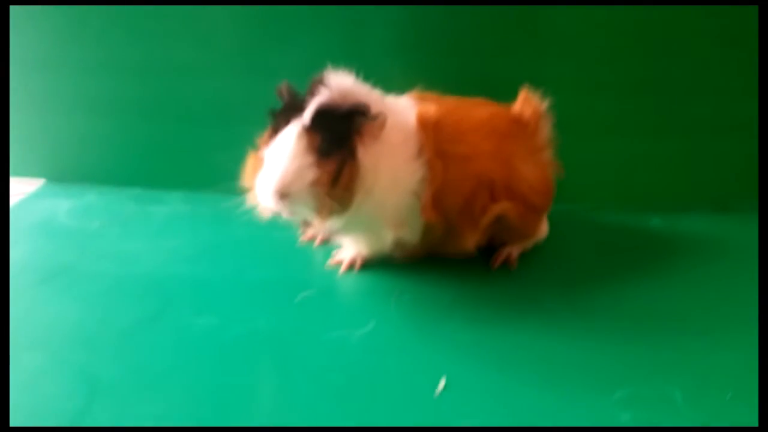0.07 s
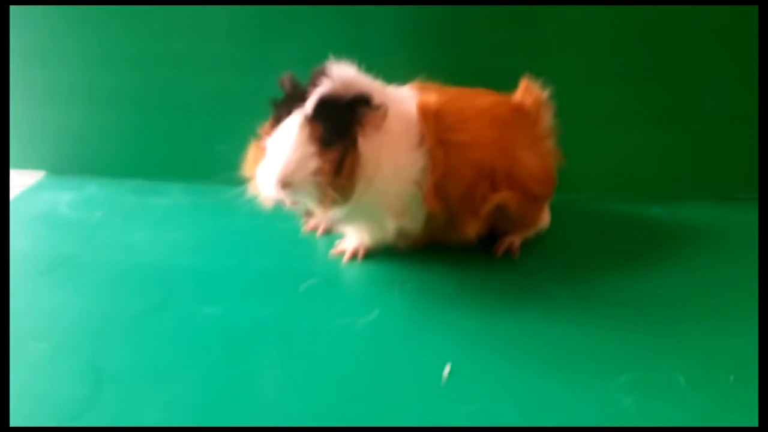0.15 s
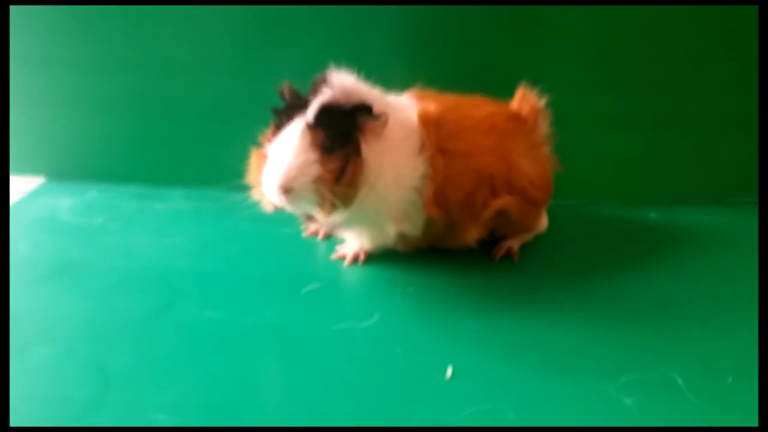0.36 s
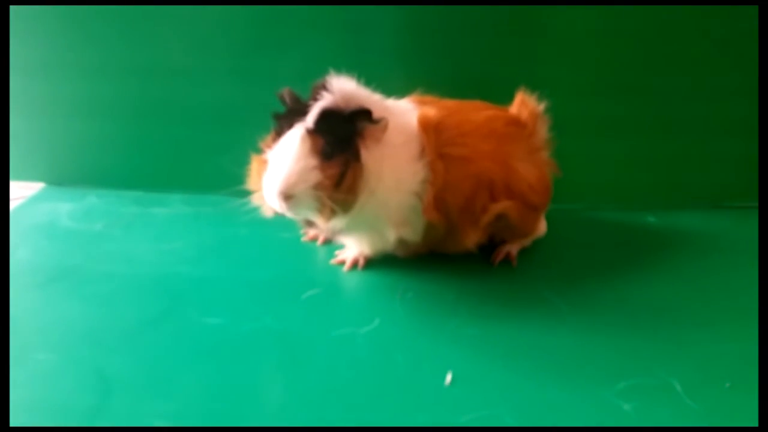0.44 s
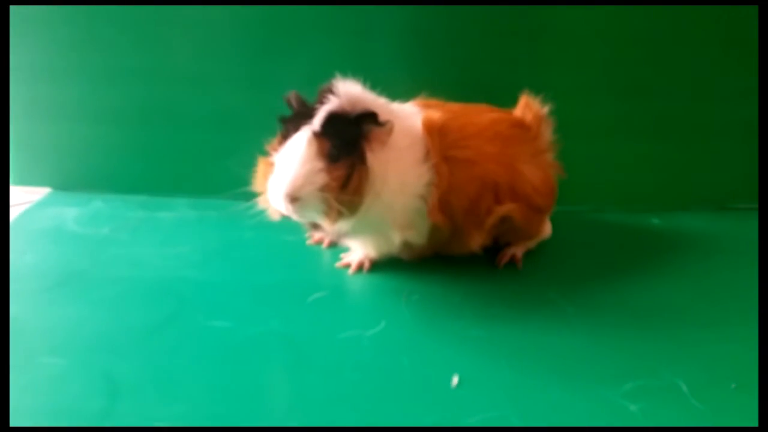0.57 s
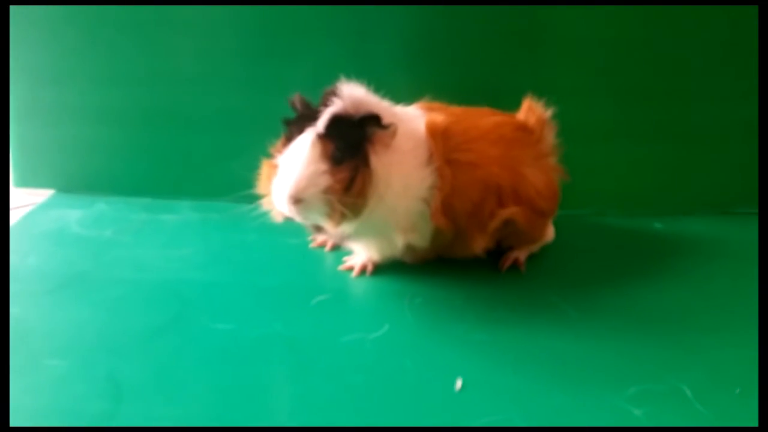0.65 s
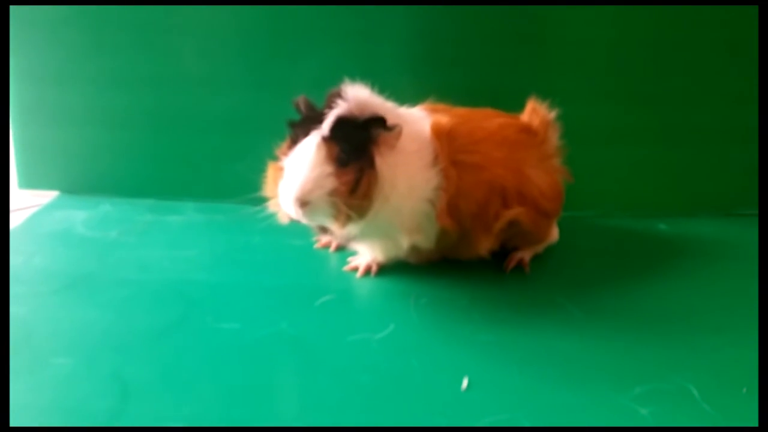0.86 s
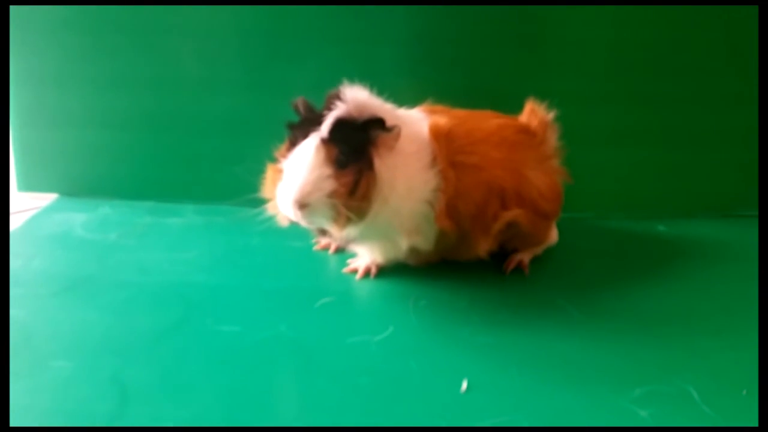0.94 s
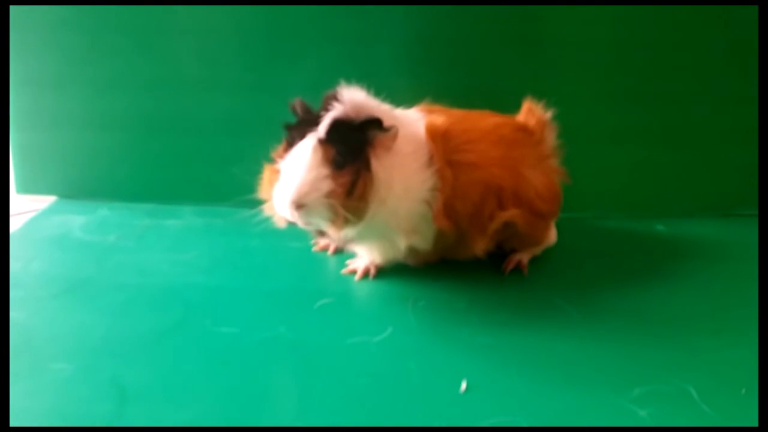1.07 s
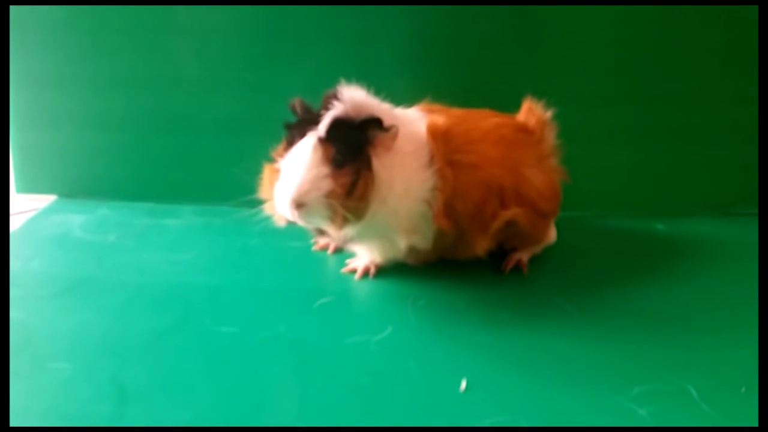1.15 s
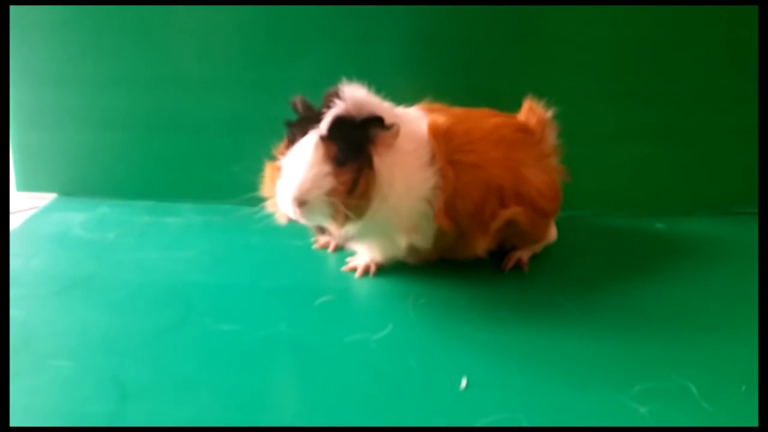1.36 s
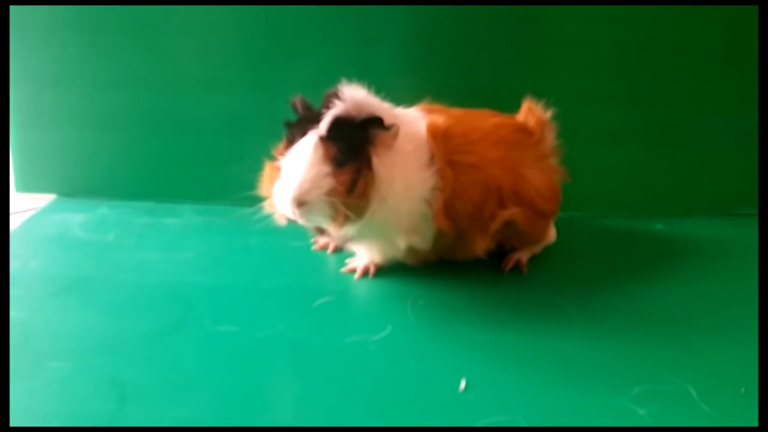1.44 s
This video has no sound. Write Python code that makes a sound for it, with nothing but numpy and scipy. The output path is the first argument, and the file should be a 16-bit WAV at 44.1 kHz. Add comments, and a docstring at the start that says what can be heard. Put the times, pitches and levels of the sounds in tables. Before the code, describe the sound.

A guinea pig wheeks four times, with two shrill squeals, in a quiet room.

```python
"""On a table in a quiet room, a guinea pig wheeks four times. Each call opens with a low voiced chirp that
sweeps upward, then thins into a hiss of air through the tight throat, ending in a puff as it opens.
In the first and third call the hiss catches as a loud, pure squeal that rings on in the room.
Underneath: room noise, rumble, a soft rustle, two dull bumps and two faint tones."""
import sys
import numpy as np
from scipy import signal
from scipy.fft import rfft, irfft
from scipy.io import wavfile

SR = 44100
rng = np.random.default_rng(int(sys.argv[2]) if len(sys.argv) > 2 else 0)


def pcm_store(signal):
    """Save signal as 16-bit PCM."""
    levels = np.round(np.clip(np.atleast_2d(signal), -1, 1) * 32767)
    wavfile.write(sys.argv[1], SR, levels.astype(np.int16).T)


N = 66150
T = np.arange(N) / SR
ATTACK_S = 0.0022
JITTER, JITTER_S = 0.00077, 0.0025  # relative rms pitch deviation, its time scale


def chirp(start, flip, end, low_hz, scoop_hz, bend, flip_hz, sweep_hz,
          db, overtone_db, swept_db, swept_overtone_db, air_db, harmonics=9):
    """A low tone settles, climbs and swells, then flips up into a thin whistle; air leaks alongside."""
    # Each row: share of the time to the flip, share of the pitch climb before bending, gain in dB.
    climb = [(0, 0, -14.5), (.16, 0.0053, -11), (.4, .1, -9), (0.599, .29, -7.5), (.8, .53, -5.5),
             (0.919, .75, -1.5), (1.001, 0.96, 1.5)]
    # Throat colour before and after the flip. Each row: frequency in Hz, overtone gain in dB.
    low_throat = [(1350, -7.5), (1620, -17), (1850, -29), (2200, -26), (2700, -40), (3200, -30),
                  (3700, -36), (4300, -22.5), (5200, -40), (6800, -27), (10000, -52)]
    thin_throat = [(2000, -16), (3300, -10), (4500, -10), (6000, -22.5), (7400, 2), (8600, -35),
                   (10400, -5.5), (11700, -25.5), (13200, -13.5), (15500, -32.5)]
    # Leaking air. Each row: frequency in Hz, relative level in dB.
    air_colour = [(1500, -36), (3200, -11), (4400, -3), (5500, -9), (6700, 2), (8700, 1.5), (10000, -6),
                  (12000, -15), (13700, -9), (16000, -35)]
    scoop_s, sweep_s, flip_s, release_s = 0.0065, 0.041, 0.014, 0.0068
    sweep_jitter, shimmer_db, flicker_db, flicker_s = 0.0081, 2, 3.5, 0.002
    tilt_db_per_octave, air_fade_db, air_lead_s = -6.5, -6, 0.032

    progress = np.clip((T - start) / (flip - start), 0, 1)
    at, risen, climb_db = np.transpose(climb)
    hz = low_hz + (flip_hz - low_hz) * np.interp(progress, at, risen) ** bend
    hz += scoop_hz * np.exp(-np.maximum(T - start, 0) / scoop_s)
    hz += sweep_hz * (1 - np.exp(-np.maximum(T - flip, 0) / sweep_s))
    thin = ramp(flip, flip_s)
    phase = voice_phase(hz, JITTER + sweep_jitter * thin)
    tone = np.sin(phase)
    for k in range(2, harmonics + 1):
        tilt_db = tilt_db_per_octave * progress ** 2 * np.log2(k / 2)  # purer towards the flip
        low_db = overtone_db + read(low_throat, k * hz) + tilt_db
        thin_db = swept_overtone_db + read(thin_throat, k * hz)
        partial_db = (1 - thin) * low_db + thin * thin_db
        partial_db += flicker_db * (1 - 1 / k) * wobble(flicker_s)
        tone += amp(partial_db) * np.sin(k * phase) * (k * hz < SR / 2)
    rising_db = db + np.interp(progress, at, climb_db)
    wavering_db = swept_db + shimmer_db * wobble(JITTER_S)
    tone *= amp((1 - thin) * rising_db + thin * wavering_db)
    tone *= ramp(start - ATTACK_S / 2, ATTACK_S)
    air = noise(air_colour) * amp(air_db + air_fade_db * progress) * ramp(start - air_lead_s, air_lead_s)
    return np.sqrt(2) * (tone + air) * (1 - ramp(end - release_s, release_s))


def squeal(curve):
    """The hiss catches as a clean, high whistle of three partials."""
    at, hz, *partials_db = np.transpose(curve)
    phase = voice_phase(np.interp(T, at, hz), JITTER)
    tone = sum(amp(np.interp(T, at, db)) * np.sin(k * phase) for k, db in enumerate(partials_db, 1))
    return np.sqrt(2) * tone * gate(at[0], at[-1], ATTACK_S)


def hiss(start, puff, from_db, to_db, puff_db, puff_rise_s=0.0093, fade_s=0.0099):
    """Air through the tight throat swells and ends in a broader puff as the throat opens."""
    # Each row: frequency in Hz, relative level in dB.
    stream_colour = [(2500, -41), (3600, -21), (4350, -6), (5000, -12), (6500, 1), (7500, 1.5),
                     (8600, -15.5), (9500, -6.5), (12000, -29), (13800, -13.5), (16000, -28)]
    puff_colour = [(1000, -35), (2300, -14), (3400, -31), (4600, -11.5), (6000, -2.5), (7500, 3.5),
                   (8800, -4), (12000, -18), (14000, -22), (16000, -37)]
    stream = amp(np.interp(T, [start, puff], [from_db, to_db])) * ramp(start, fade_s)
    burst = amp(puff_db) * np.exp(np.minimum(T - puff, 0) / puff_rise_s)
    return (noise(stream_colour) * stream + noise(puff_colour) * burst) * (1 - ramp(puff, fade_s))


def room(x, onset_s=0.006):
    """A diffuse tail, each band dying at its own rate."""
    # Each row: frequency in Hz, T60 in seconds, tail level in dB.
    bands = [(300, 0.22, 6), (1076, 0.73, -12), (2190, 0.56, -15.5), (4020, 0.76, -12.5), (8430, 0.49, -8),
             (8770, 0.66, 0.5), (12200, 0.47, -19.5)]
    hz, t, spectra = signal.stft(rng.standard_normal(N), SR, nperseg=256)
    t60_s, tail_db = read(bands, hz)[:, None], read(bands, hz, column=2)[:, None]
    rate = np.log(1000) / t60_s
    decay = np.exp(-rate * t) * np.sqrt(2 * rate / SR)  # unit energy
    tail = signal.istft(spectra * decay * amp(tail_db), SR)[1][:N]
    return signal.fftconvolve(x, tail * ramp(onset_s / 2, onset_s))[:N]


def room_noise(floor_db=-52.5):
    """A steady noise floor under an uneven rumble and low-mid noise."""
    # Each row: frequency in Hz, relative level in dB.
    floor_colour = [(20, 1.5), (45, 0.5), (90, -9.5), (150, -10), (300, -22.5), (600, -24.5), (1500, -33),
                    (3000, -35), (7000, -38), (11000, -37), (16000, -38.5)]
    rumble_colour = [(8, 4), (25, 0), (50, -10), (90, -20), (160, -17), (300, -35), (700, -42.5),
                     (3000, -74)]
    low_mid_colour = [(60, -16), (150, -3), (280, -0.5), (380, -6), (500, -5), (700, -16), (1200, -14.5),
                      (2200, -15.5), (4000, -19.5), (9000, -30.5)]
    # Each row: time in seconds, level in dB.
    rumble_levels = [(0, -46), (.13, -41), (.3, -44.5), (.5, -47.5), (.7, -59.5), (1.0, -57), (1.2, -52),
                     (1.5, -53.5)]
    low_mid_levels = [(0, -56.5), (0.349, -61), (.72, -57.5), (0.852, -65), (1.1, -62.5), (1.2, -63),
                      (1.35, -65.5), (1.5, -63.5)]
    floor = amp(floor_db) * noise(floor_colour)
    rumble = amp(np.interp(T, *np.transpose(rumble_levels))) * noise(rumble_colour)
    low_mid = amp(np.interp(T, *np.transpose(low_mid_levels))) * noise(low_mid_colour)
    return floor + rumble + low_mid


def rustle(start_s=0.019, rise_s=0.018, fall_at_s=0.089, db=-45.5, fall_db_per_s=72.5):
    """A soft rustle rises, holds and dies away."""
    # Each row: frequency in Hz, relative level in dB.
    colour = [(100, 7.5), (200, 2), (400, -12.5), (700, 2.5), (1200, 5.5), (2500, -4), (5000, -4),
              (9000, -2.5), (12000, -26), (16000, -25)]
    level_db = db - fall_db_per_s * np.maximum(T - fall_at_s, 0)
    return amp(level_db) * ramp(start_s, rise_s) * noise(colour)


def bumps():
    """Two soft, dull bumps: bell-shaped swells of low noise."""
    # Each row: centre in seconds, Gaussian width in seconds, level in dB.
    swells = [(.05, 0.026, -49), (1.215, 0.061, -51.5)]
    # Each row: frequency in Hz, relative level in dB.
    colour = [(30, -30), (70, -4), (140, 4.5), (240, -4.5), (400, -19), (1500, -65)]
    envelope = sum(amp(db) * np.exp(-.5 * ((T - at) / width) ** 2) for at, width, db in swells)
    return envelope * noise(colour)


def faint_tone(start, end, hz, db):
    """A soft, unsteady low tone fades in and out."""
    return np.sqrt(2) * amp(db) * np.sin(voice_phase(hz, jitter=0.021)) * gate(start, end, fade_s=0.042)


def voice_phase(hz, jitter):
    """Phase along a pitch curve with relative jitter."""
    return 2 * np.pi * np.cumsum(hz * (1 + jitter * wobble(JITTER_S))) / SR


def wobble(seconds):
    """Random drift on the given time scale, rms 1."""
    return unit(signal.lfilter([1], [1, -np.exp(-1 / (seconds * SR))], rng.standard_normal(N)))


def noise(colour):
    """Noise with the given spectrum, rms 1."""
    gain = amp(read(colour, np.fft.rfftfreq(N, 1 / SR)))
    return unit(irfft(rfft(rng.standard_normal(N)) * gain, N))


def read(points, hz, column=1):
    """Interpolates a table column over log frequency."""
    columns = np.transpose(points)
    return np.interp(np.log(hz + 1), np.log(columns[0] + 1), columns[column])


def ramp(start, length):
    """Smooth step from 0 to 1."""
    return np.sin(np.pi / 2 * np.clip((T - start) / length, 0, 1)) ** 2


def gate(start, end, fade_s):
    """Window with smooth edges."""
    return ramp(start, fade_s) * (1 - ramp(end - fade_s, fade_s))


def amp(db):
    """Decibels to gain."""
    return 10 ** (np.asarray(db) / 20)


def unit(x):
    """Scales to rms 1."""
    return x / np.sqrt(np.mean(x ** 2) + 1e-20)


def scene(hiss_send_db=-7):
    """Four calls, their ring in the room and the background; mono."""
    # Each row: start, flip and end in seconds, low pitch and opening scoop in Hz, bend (over 1 climbs
    # late), flip pitch and sweep above it in Hz, then in dB: base level and overtone gain before the
    # flip, the same after it, starting air level.
    chirps = [(0.027, 0.089, 0.12, 703.5, 8.8, 1.01, 1169, 1965, -31.5, 1.5, -52, 0, -49),
              (0.522, 0.588, .623, 667.6, 10.5, 0.86, 1135, 2254, -33.5, 5.5, -53, 0, -55),
              (0.923, 0.993, 1.040, 691, 9, .95, 1111, 2060, -32.5, -1, -50, -1.5, -59),
              (1.364, 1.427, 1.450, 677.4, 85, 1.29, 1096, 2360, -34.5, 1, -57, -5, -62)]
    # Each row: time in seconds, pitch in Hz, levels of partials 1 to 3 in dB.
    long_squeal = [(.228, 3780, -64, -76, -90.5), (.243, 3780, -41, -45, -61),
                   (.248, 3905, -30, -18.5, -45.5), (.257, 3954, -27, -18, -41.5),
                   (.273, 3989, -28, -23.5, -37), (.284, 3947, -29.5, -16, -42),
                   (.292, 4027, -28, -23.5, -46), (.303, 4144, -32, -24.5, -45),
                   (.314, 4210, -35.5, -36.5, -54), (.325, 4300, -40, -49, -69),
                   (.331, 4300, -52, -60, -81)]
    short_squeal = [(1.085, 3650, -68, -73, -92), (1.108, 4040, -60, -77.5, -85),
                    (1.116, 4133, -41.5, -43, -62), (1.122, 4126, -33.5, -25, -50),
                    (1.128, 4176, -34.5, -21.5, -66), (1.136, 4260, -35, -29.5, -41),
                    (1.146, 4319, -32.5, -48, -45), (1.158, 4336, -37.5, -49.5, -59),
                    (1.18, 4340, -53, -32, -74)]
    # Each row: start and puff time in seconds, start, end and puff levels in dB.
    hisses = [(0.12, 0.344, -54.5, -44.5, -38), (0.63, 0.751, -58.5, -48.5, -40),
              (1.038, 1.182, -56, -44.5, -37.5), (1.44, 1.6, -65.5, -65, -43)]
    # Each row: start and end in seconds, pitch in Hz, level in dB.
    faint_tones = [(0.007, 0.164, 492.7, -58), (0.115, 0.35, 276, -60)]
    voice = sum(chirp(*row) for row in chirps) + squeal(long_squeal) + squeal(short_squeal)
    air = sum(hiss(*row) for row in hisses)
    tones = sum(faint_tone(*row) for row in faint_tones)
    reverb = room(voice + amp(hiss_send_db) * air)
    return (voice + air + reverb + room_noise() + rustle() + bumps() + tones)[None]


def record(dry, cutoff_hz=15900):
    """Steep low-pass band limit."""
    lowpass = signal.firwin(511, cutoff_hz, window=("kaiser", 9), fs=SR)
    return signal.oaconvolve(dry, lowpass[None], "same")


dry = scene()
out = record(dry)
pcm_store(out)
```